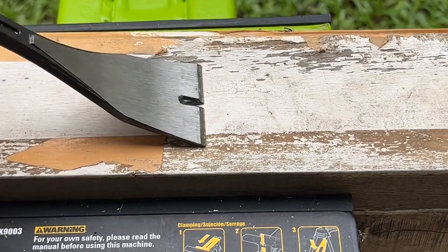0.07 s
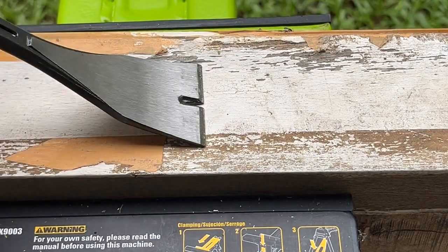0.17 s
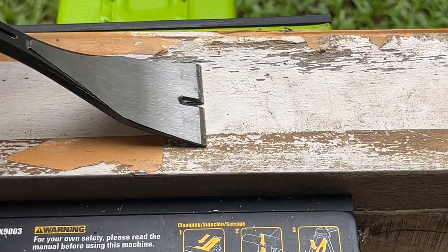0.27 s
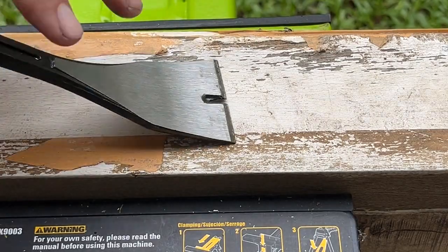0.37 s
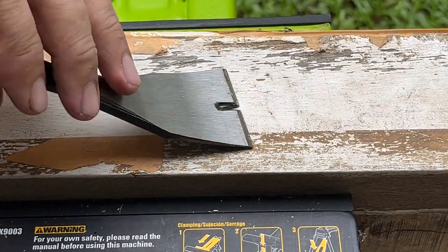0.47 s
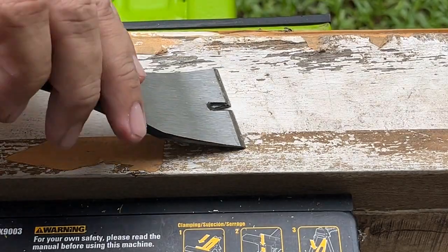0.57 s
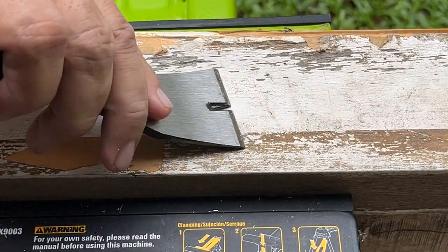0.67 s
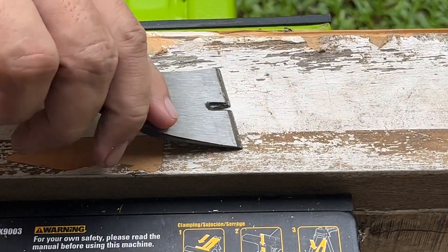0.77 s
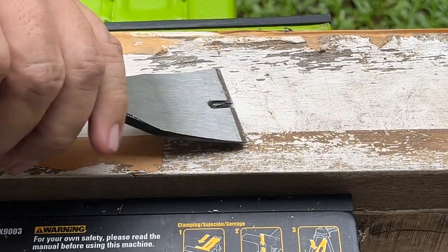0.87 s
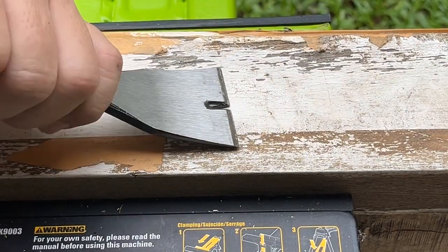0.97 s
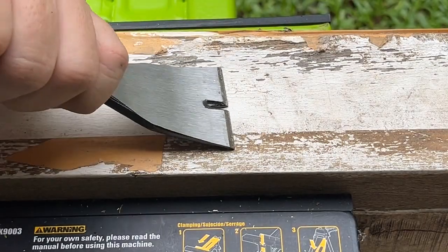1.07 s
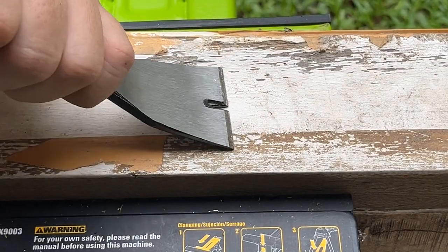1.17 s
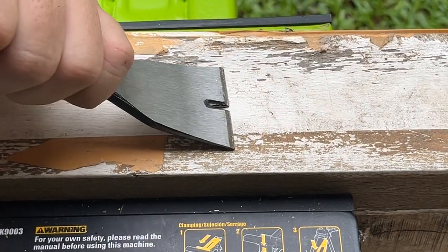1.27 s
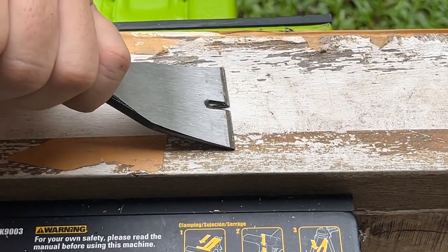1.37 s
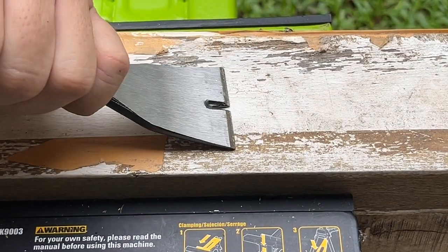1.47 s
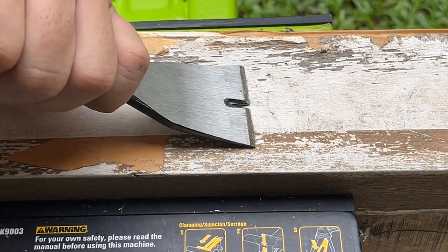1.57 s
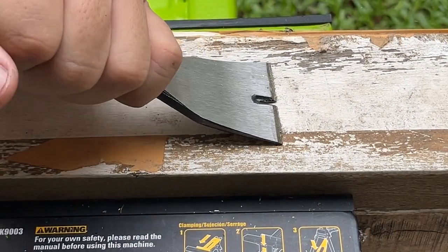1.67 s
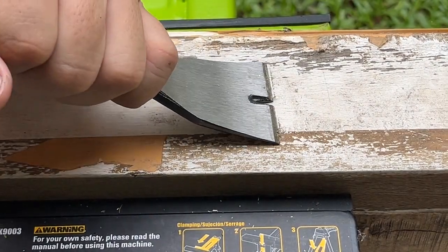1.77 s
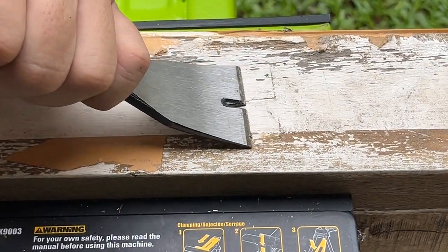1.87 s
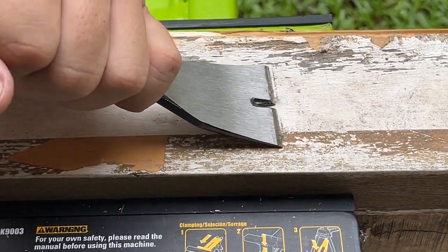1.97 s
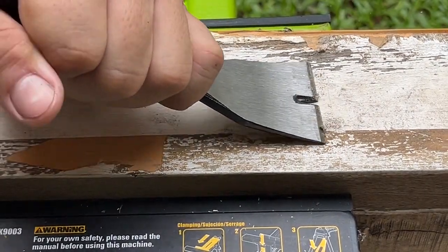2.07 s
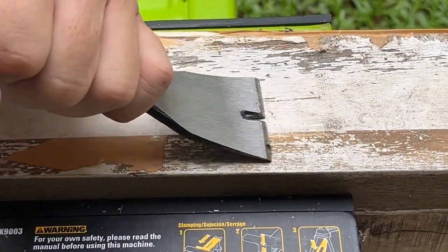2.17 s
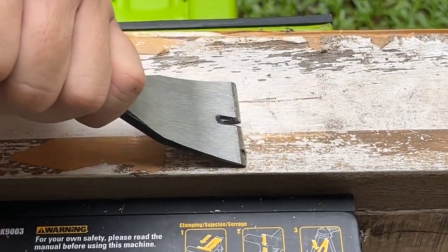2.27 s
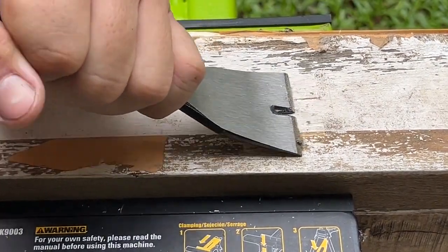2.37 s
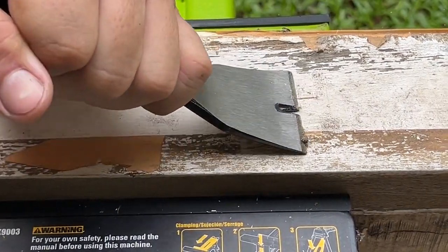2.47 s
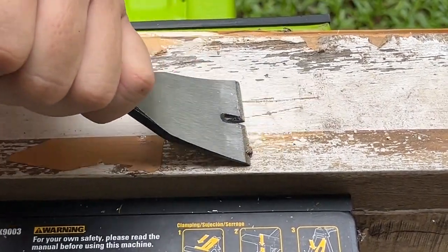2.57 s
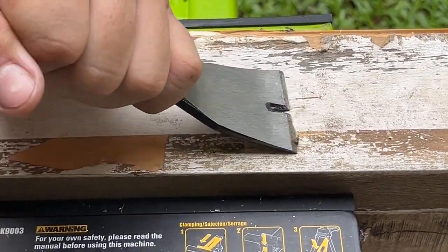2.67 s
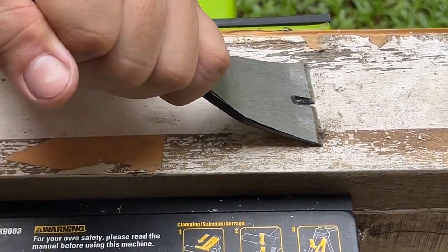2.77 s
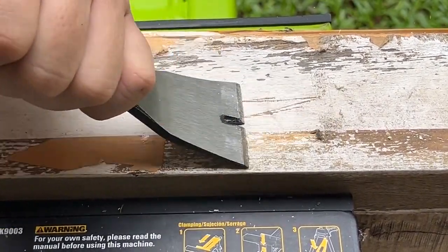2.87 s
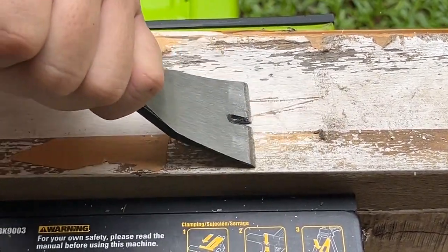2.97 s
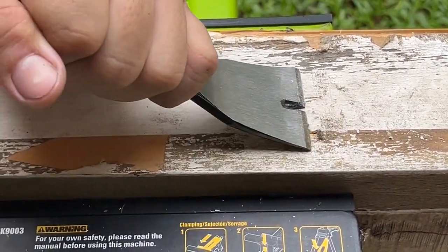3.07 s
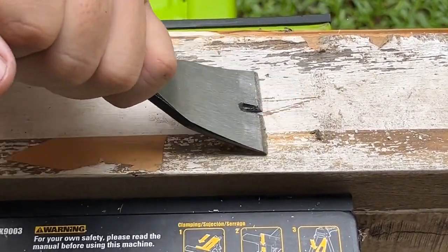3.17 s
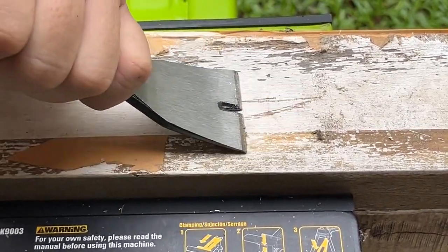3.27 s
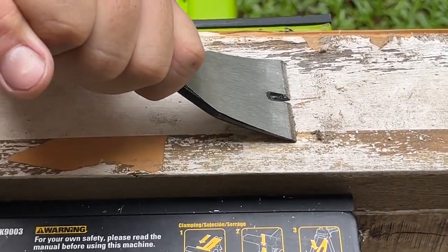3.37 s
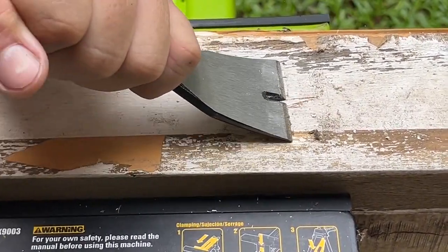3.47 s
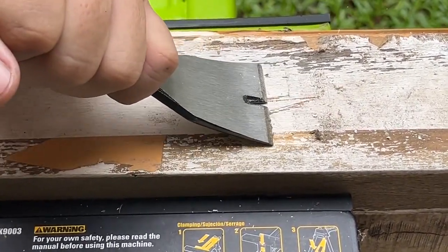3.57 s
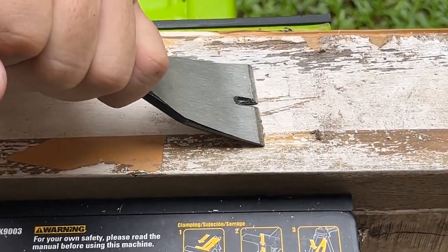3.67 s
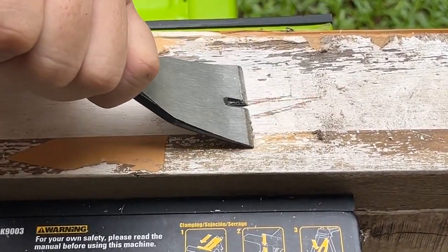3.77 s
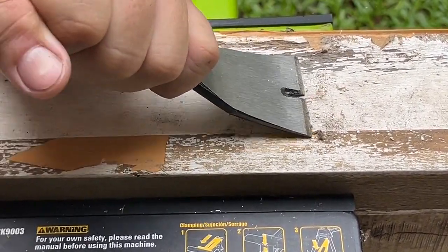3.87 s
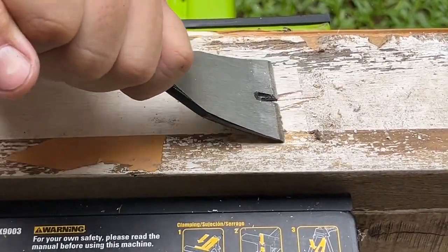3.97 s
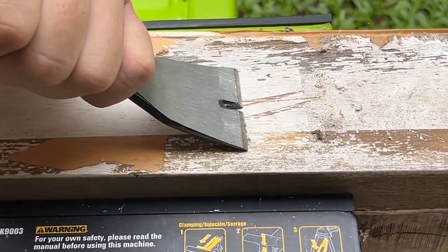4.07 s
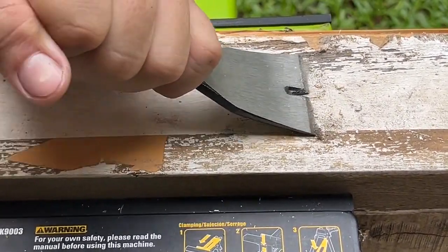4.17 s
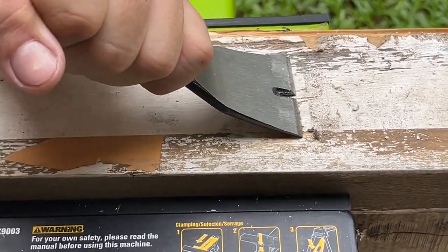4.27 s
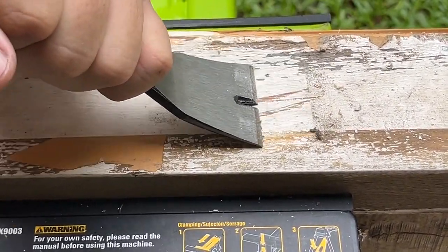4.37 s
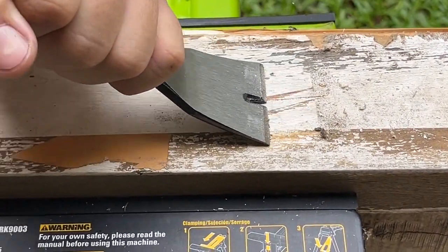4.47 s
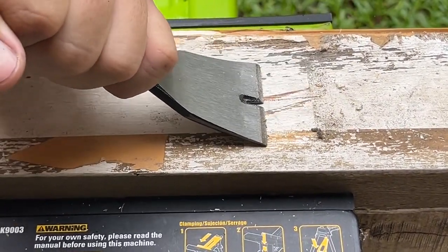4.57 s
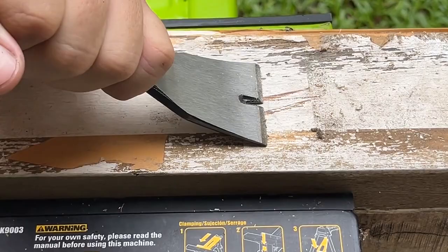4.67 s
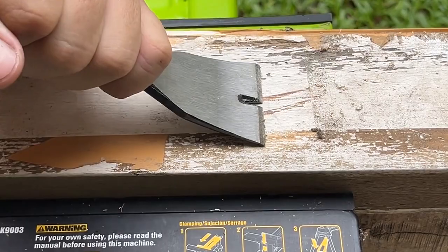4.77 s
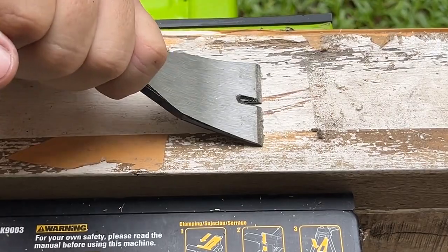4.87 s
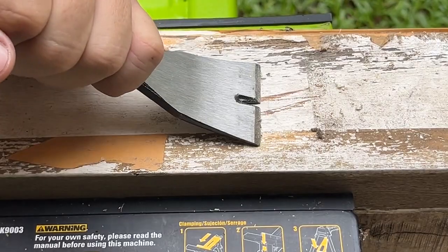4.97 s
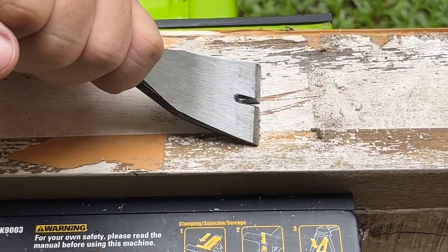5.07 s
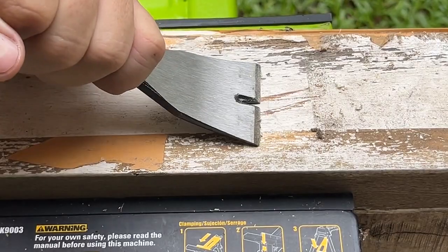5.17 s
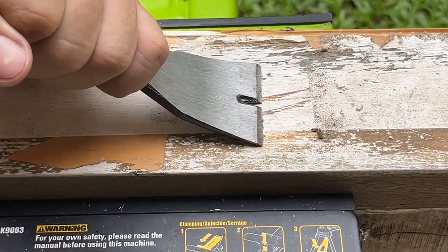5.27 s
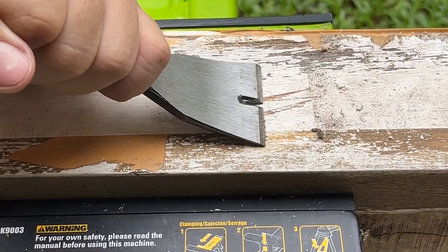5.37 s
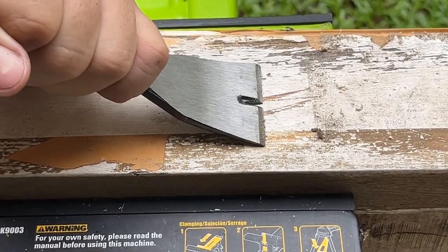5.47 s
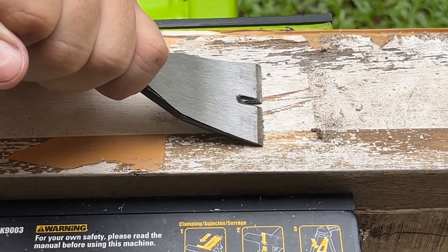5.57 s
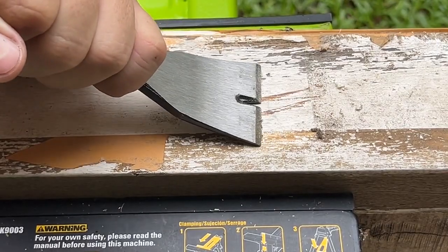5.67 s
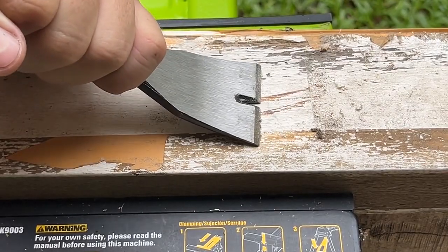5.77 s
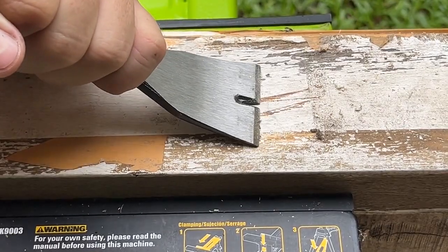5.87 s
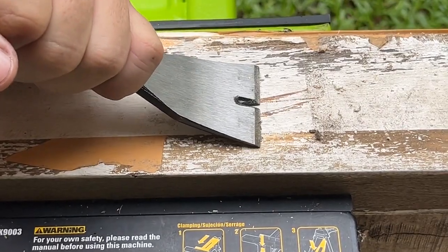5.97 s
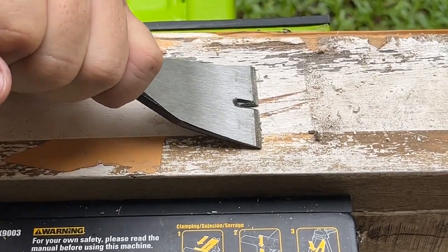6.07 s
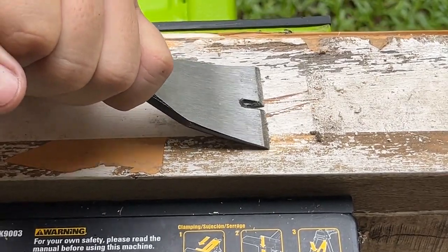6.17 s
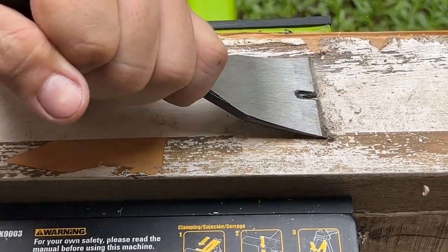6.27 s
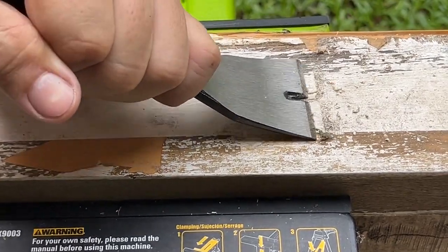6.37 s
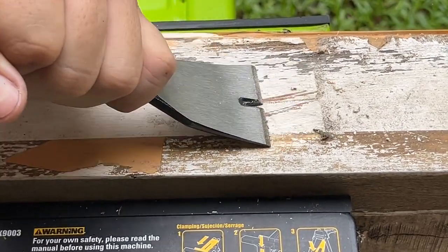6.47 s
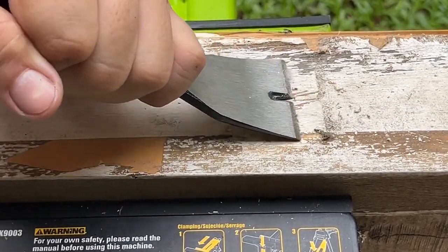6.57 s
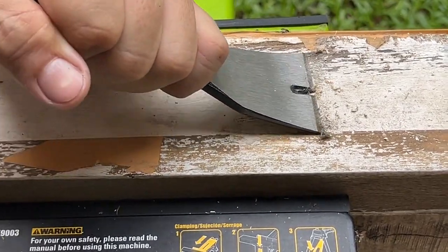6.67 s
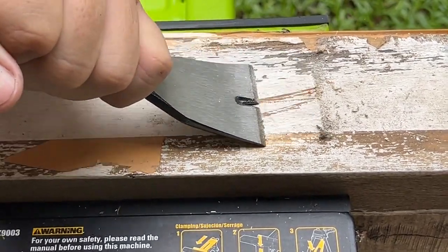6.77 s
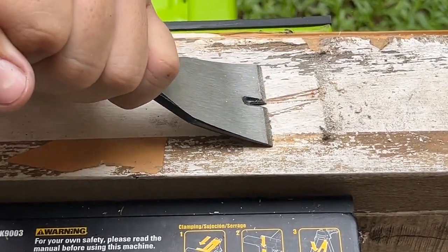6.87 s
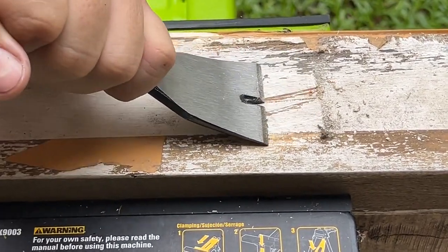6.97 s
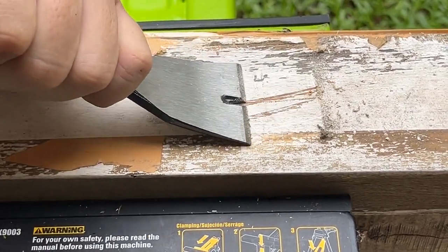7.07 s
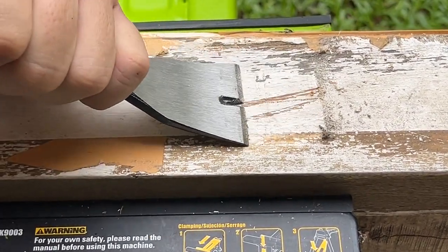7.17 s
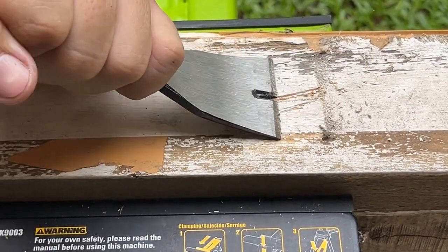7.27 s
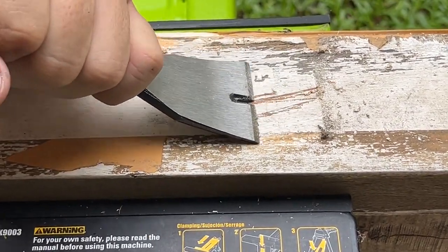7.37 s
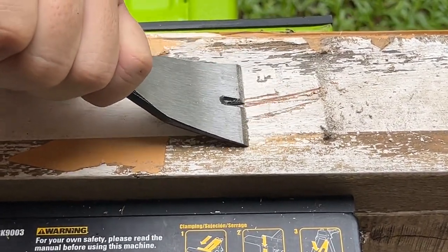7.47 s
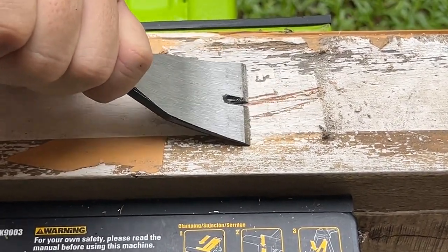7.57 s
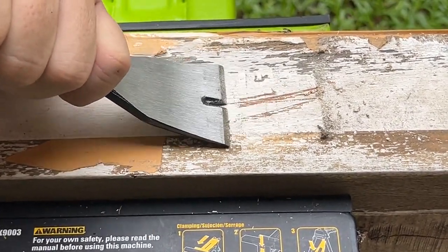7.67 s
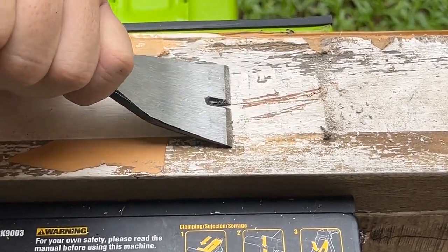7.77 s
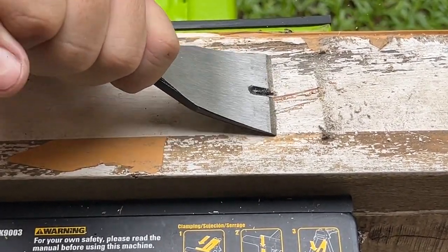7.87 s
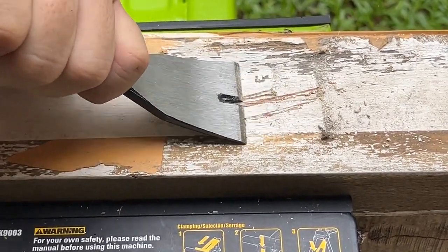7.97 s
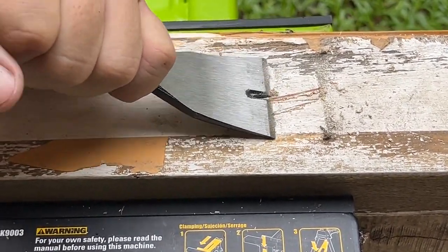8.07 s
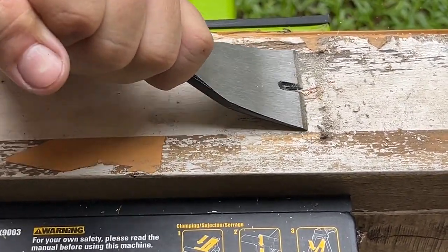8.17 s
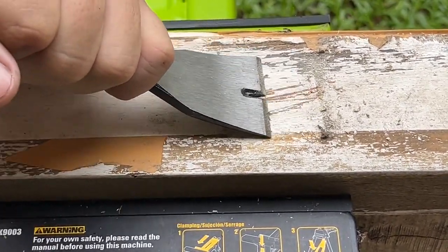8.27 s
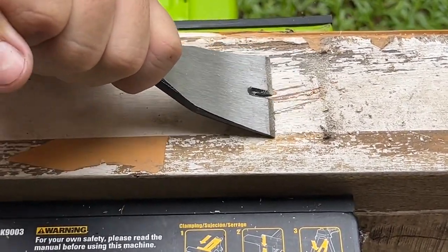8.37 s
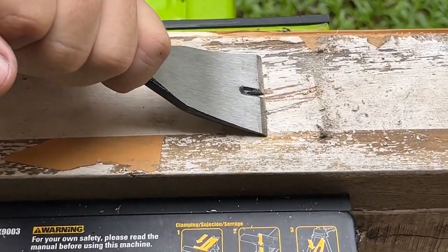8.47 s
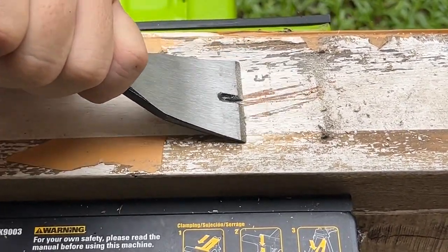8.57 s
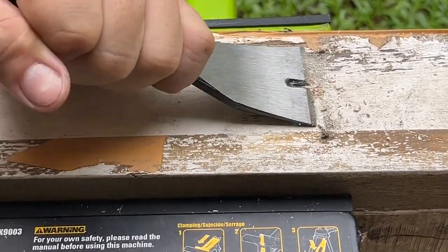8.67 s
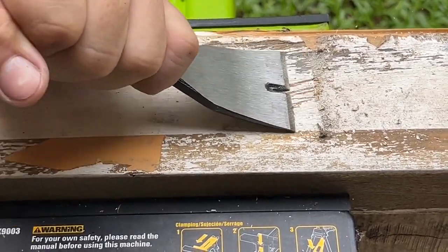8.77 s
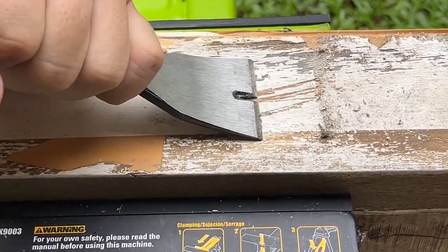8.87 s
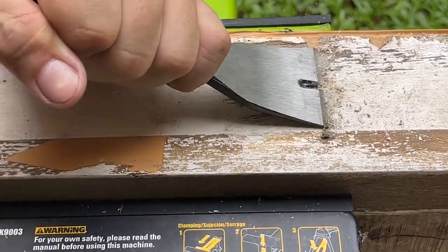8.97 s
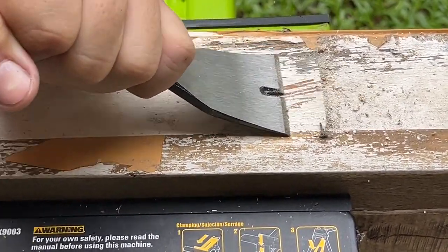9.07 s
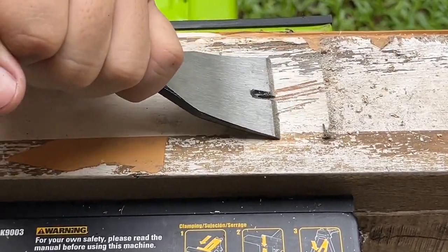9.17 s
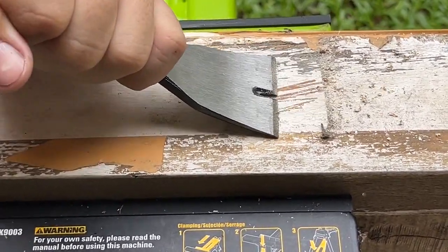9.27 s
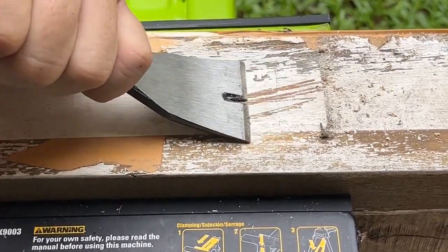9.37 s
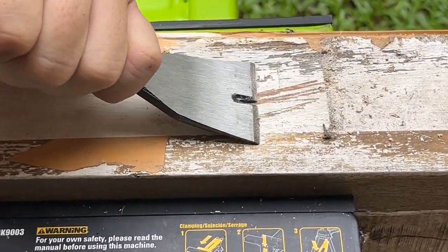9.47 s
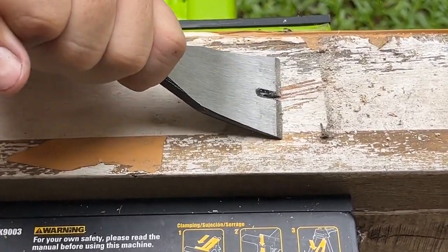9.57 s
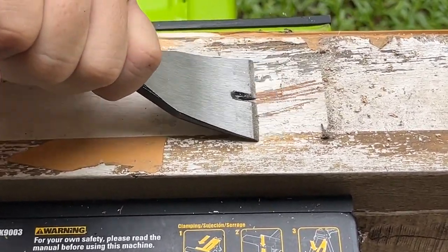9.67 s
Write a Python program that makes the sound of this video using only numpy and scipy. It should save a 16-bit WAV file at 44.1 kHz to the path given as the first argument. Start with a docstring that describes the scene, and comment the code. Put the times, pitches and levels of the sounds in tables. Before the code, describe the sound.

A quiet yard, close microphone. Soft gritty shuffling, wind buffets and a few small knocks as a hand takes a flat steel bar. Then short, harsh scrapes over flaking painted wood, strong pushes alternating with weaker draws back. A pause of shuffles, knocks and wind thumps, with distant rising bird whistles, precedes a second, quicker series that runs to the end.

```python
"""A hushed yard with gritty shuffling, wind on the microphone and small knocks; then a flat steel bar scrapes close by.
It is pushed and drawn back in short strokes over flaking paint on a board. Random snaps of paint and fine grinding
noise ring resonances of board and bar. Birds are wavering whistles with an echo, wind is low noise in short
bursts, knocks and the singing steel are decaying or wavering tones. Hush, rumble and a faint whine lie beneath."""
import sys
import numpy as np
from scipy import signal
from scipy.fft import rfft, irfft, next_fast_len
from scipy.io import wavfile
from scipy.ndimage import uniform_filter1d

SR = 44100
rng = np.random.default_rng(int(sys.argv[2]) if len(sys.argv) > 2 else 0)


def int16_out(signal):
    """Quantize to a 16-bit WAV file."""
    q = np.round(np.clip(np.atleast_2d(signal).T, -1, 1) * 32767)
    wavfile.write(sys.argv[1], SR, q.astype(np.int16))


N = 429093  # length of the scene in samples

# Hard pushes and lighter draws back: start_s, length_s, rasp_db, peak_share (part of the stroke gone by when
# it is strongest), pressure (0 to 1), hum_drive_db (over the rasp), brightness_db
STROKES = [(1.535, 0.14, -22.5, 0.31, 0.7, -13, -6), (1.749, .13, -41, 0.48, 0, -30, -4),
           (1.946, 0.11, -21, 0.31, 0.9, -11.5, 2), (2.099, 0.14, -35, 0.4, 0.24, -38, 1),
           (2.308, 0.12, -21.5, 0.32, 1, -23, 2), (2.461, .12, -30.5, 0.47, 0.2, -20, -1.5),
           (2.629, 0.11, -21.5, 0.36, .75, -29, 1.5), (2.777, 0.12, -33.5, 0.37, .05, -18.5, -0.5),
           (2.967, 0.12, -25, 0.3, 0.98, -23.5, 2.5), (3.119, .14, -33, .3, 0, -23, -8),
           (3.294, 0.096, -24, 0.39, 1, -16, 0), (3.453, 0.093, -39, 0.53, 0.4, -24, -2.5),
           (3.642, 0.086, -43.5, 0.57, 0.2, -21, -1), (3.786, 0.089, -22.5, 0.68, 1, -8.5, -1),
           (3.94, 0.11, -31, .38, 0.1, -27, -1.5), (4.106, 0.099, -26.5, 0.31, 0.97, -12.5, 2),
           (4.251, .1, -33, 0.4, 0.36, -19, 1), (4.434, .034, -34, 0.39, 1, -13, -3.5),
           (6.172, 0.099, -23.5, 0.6, 0.85, -16.5, 2.5), (6.351, 0.13, -35, 0.33, 0.25, -19, 4.5),
           (6.536, 0.064, -31.5, 0.34, 0.6, -20, 2.5), (6.585, 0.042, -23, 0.35, 0.73, -15.5, 1),
           (6.68, 0.13, -34, 0.41, 0.23, -22, 4), (6.843, 0.031, -35, 0.53, 0.8, -25, -12),
           (7.026, 0.099, -40.5, 0.32, 0, -24, 0), (7.188, 0.083, -25, 0.39, 1, -10, 0.5),
           (7.331, 0.094, -35, 0.43, .25, -22, 0), (7.455, 0.07, -38.5, 0.79, 0.84, -18, -4),
           (7.626, 0.083, -39.5, 0.32, 0.1, -24, 0), (7.77, 0.088, -19, 0.45, 0.79, -21, -7),
           (7.903, 0.092, -35.5, .58, .4, -33, -0.5), (8.044, 0.093, -19, 0.5, 0.66, -20, -3),
           (8.19, 0.089, -35, 0.52, 0.5, -23, 3.5), (8.305, 0.057, -43.5, 0.55, 0.96, -16, -3),
           (8.463, 0.075, -37.5, 0.63, 0.06, -17, -0.5), (8.608, 0.097, -23, 0.73, 0.91, -22, 0.5),
           (8.728, .12, -30, 0.55, 0.3, -32, -5), (8.899, 0.08, -19.5, .62, 0.78, -25, 0.5),
           (9.014, 0.11, -31, 0.47, .25, -21, -5), (9.167, 0.044, -33.5, .4, 1, -13, -1),
           (9.313, 0.1, -34.5, 0.44, 0.05, -25, 0), (9.457, 0.084, -23.5, 0.61, 1, -13, 0),
           (9.591, 0.073, -32.5, 0.47, 0.07, -24, -6.5), (9.685, 0.056, -28, 0.42, .7, -14, -3)]
# Share-out of each stroke, rows board, blade, face, edge: lightest_touch_db and full_pressure_db (both over
# the rasp), brightness_share (0 to 1)
PART_LEVELS = [(-13, 0.5, 0), (-9.5, -9, 0.73), (-13, -18.5, 0.98), (-4.5, -10.5, 0.86)]
# Resonances of the board and of four parts of the bar: pitch_hz, width_hz, level_db
BOARD = [(344, 59, -17.5), (491, 68, -7.5), (536, 64.3, -2), (609.4, 32, 0), (713, 26.5, -9.5)]
SHANK = [(829, 70, -10), (901.4, 55, 0.5), (975, 54.6, -0.5), (1067, 53, -9), (1154, 120, -15),
         (1348, 100, -12), (1436, 115, -11.5), (1633, 660, -18.5), (1740, 164, -12.5), (1962, 78, -10.5),
         (2051, 120, -13.5), (2160, 51, -18)]
BLADE = [(2510, 77, -19.5), (2950, 260, -17.5), (3286, 200, -1), (3520, 167, 5), (3780, 118, 1.5),
         (3930, 320, -16.5)]
FACE = [(5470, 210, -1.5), (6500, 550, 0), (6906, 450, 0.5), (7460, 420, -5)]
EDGE = [(8770, 530, -4.5), (9660, 590, -5.5), (10070, 270, 0.5), (11160, 520, 4), (11580, 620, 0.5),
        (12500, 300, -4.5), (13700, 540, -8), (14600, 700, -13.5)]
BITE_DB, LET_GO_DB = 16, 29.5  # how far under its strongest a stroke starts and ends
BITE_BEND, LET_GO_BEND = 1.59, 2.39  # higher powers keep the stroke strong for longer
SLOW_STEEL_DB = 4.5  # face and edge start this much weaker still, until the bar is up to speed


def scraping():
    """Friction drives board and bar together; pressing harder wakes the board and dulls the steel."""
    gains = np.zeros((6, N))  # rows: shank, board, blade, face, edge, hum
    for start, length, db, peak, pressure, hum_db, bright_db in STROKES:
        i = np.arange(int(start * SR), min(int((start + length) * SR), N))
        progress = (i / SR - start) / length
        before_peak = np.clip(1 - progress / peak, 0, 1)
        after_peak = np.clip((progress - peak) / (1 - peak), 0, 1)
        rasp_db = db - BITE_DB * before_peak ** BITE_BEND - LET_GO_DB * after_peak ** LET_GO_BEND
        parts_db = [light + (hard - light) * pressure + share * bright_db
                    for light, hard, share in PART_LEVELS]
        levels_db = rasp_db + np.array([0, *parts_db, hum_db])[:, None]
        levels_db[3:5] -= SLOW_STEEL_DB * before_peak
        gains[:, i] += undb(levels_db)
    gains = uniform_filter1d(gains, size=260)  # the edge bites and lets go within a few ms

    coarse = friction(rate=1800, scatter_db=2.5, grit=0.93, patchy_db=2.0)
    fine = friction(rate=5500, scatter_db=3.0, grit=1.7, patchy_db=2.5)
    mixed = 0.47 * coarse + 0.72 * fine
    forces = coarse, coarse, mixed, fine, fine
    parts = SHANK, BOARD, BLADE, FACE, EDGE
    rasping = sum(ring(gain * force, modes, shift_db=3.5)
                  for gain, force, modes in zip(gains[:5], forces, parts))
    return rasping + board_hum(gains[5]) + bench_shake(gains[0])


HUM_HZ, HUM_T60_S = 509, 0.26  # pitch, and time to die away by 60 dB


def board_hum(push):
    """Slips lock to one board resonance, which builds while pushed and fades as a slightly wavering tone."""
    keep = np.exp(-np.log(1000) / (HUM_T60_S * SR))
    swing = signal.lfilter([1 - keep], [1, -keep], push * undb(1.4 * walk(60)))
    pitch = HUM_HZ * (1 + 0.00596 * walk(30))
    return 3 * swing * np.sin(2 * np.pi * np.cumsum(pitch) / SR)


# Colour of the low rumble, used for the bench here and for far traffic and light air in yard():
# pitch_hz, level_db (per Hz)
RUMBLE_COLOUR = [(15, -5), (30, -3), (90, -4.5), (200, -7.5), (400, -34)]
SHAKE_DB, SHAKE_S = -26, 0.069  # level over the rasp, and the span over which the shake is smoothed


def bench_shake(rasp_gain):
    """The bench shakes under each stroke as low noise that follows a smoothed copy of the rasp."""
    smooth = uniform_filter1d(rasp_gain, int(SHAKE_S * SR))
    return undb(SHAKE_DB) * smooth * coloured(RUMBLE_COLOUR, size=N)


# Small hard ticks and knocks: start_s, level_db, pitch_hz, treble_crack_db (over the level)
KNOCKS = [(0.396, -28.5, 1360, -9), (0.455, -33, 931, -11), (0.493, -20, 1290, -18.5),
          (0.864, -55, 1070, 12), (0.952, -40.5, 1580, 0), (1.049, -33, 1750, -24), (1.298, -54, 985, 11),
          (4.85, -41.5, 1250, 1.5), (4.931, -38, 1890, 0.5), (5.149, -29, 1970, -29),
          (5.406, -22, 1740, -18), (5.814, -13.5, 1550, -19), (5.819, -27, 1610, -5),
          (6.862, -36, 920, -22), (9.238, -30, 420, -20), (9.461, -29, 900, -20)]
# Colour of the duller part of each crack: pitch_hz, level_db (per Hz)
KNOCK_COLOUR = [(180, -27), (300, 4), (1630, -6), (3280, -12), (4750, -26), (5520, -15), (8000, -26),
                (10400, -59), (17600, -120)]
# Colour of the crack's treble, shared with rustling(): pitch_hz, level_db (per Hz)
RUSTLE_COLOUR = [(2940, -50), (5000, -7), (5910, -7), (7010, -5), (7460, -10), (8560, -10), (10100, 2.5),
                 (12300, -3), (13600, -8.5), (15600, -12)]


def knocks():
    """Each knock is a few cycles of a dull ring with a short crack of noise."""
    out, size = np.zeros(N), 1024
    t = np.arange(size) / SR
    shape = (1 - np.exp(-t / 0.00033)) * np.exp(-t / 0.0031)  # quick rise, then a decay of a few ms
    for start, db, hz, crack_db in KNOCKS:
        treble = undb(crack_db) * coloured(RUSTLE_COLOUR, size=size)
        crack = treble + 0.4 * coloured(KNOCK_COLOUR, size=size)
        i = int(start * SR)
        out[i:i + size] += undb(db) * 0.87 * shape * (np.sin(2 * np.pi * hz * t) + crack)
    return out


# Moments when the steel sings: start_s, attack_s, hold_s, release_s, level_db
SINGS = [(.335, 0.043, 0.03, .07, -46), (.53, 0.011, .04, .05, -63)]
# Tones of the singing steel: pitch_hz, level_db
SING_TONES = [(7190, -21), (9810, -11), (10510, 2.5), (12700, -7)]


def singing_steel():
    """The steel sings as fingers slide onto it: a few high tones that waver separately."""
    return swell(SINGS) * tones(SING_TONES, waver_db=3.5)


# Shuffling nearby: start_s, attack_s, hold_s, release_s, level_db, grit_db (upper resonances, over that level)
SHUFFLES = [(0., .002, .01, 0.37, -48, -13), (.2, .15, 0.14, .03, -50, -11),
            (0.488, 0.018, 0.061, 0.19, -40.5, -12), (4.996, 0.016, 0.039, .08, -37, -5.5),
            (5.064, 0.0069, .015, 0.11, -41.5, -3.5), (5.129, 0.021, .005, 0.021, -36.5, -6.5),
            (5.16, .01, 0.16, .05, -50.5, -5.5), (5.35, .01, 0.019, 0.045, -43, -8),
            (5.391, 0.016, .01, 0.088, -36, -8), (5.428, .02, 0.14, .1, -48.5, -6.5),
            (5.805, 0.012, 0.0034, .014, -18.5, -7.5), (5.823, .008, 0.032, 0.25, -32, -6),
            (6.456, 0.033, 0.043, 0.034, -45, -13), (6.8, 0.049, .01, 0.093, -48, -12)]
# Resonances rung by the shuffling, four dull ones and then the gritty ones: pitch_hz, width_hz, level_db
SHUFFLE_MODES = [(465, 184, 1), (860, 500, -2.5), (1495, 270, 1.5), (1810, 266, -1.5), (2450, 650, -9.5),
                 (3540, 570, -8), (6520, 450, -20)]


def shuffling():
    """One rubbing force rings dull low resonances and, more or less strongly, gritty upper ones."""
    force = friction(rate=900, scatter_db=2.5, grit=1.16, patchy_db=0.5)
    dull = swell([row[:5] for row in SHUFFLES])
    gritty = swell([(*row[:4], row[4] + row[5]) for row in SHUFFLES])
    low = ring(dull * force, SHUFFLE_MODES[:4], shift_db=3.0)
    high = ring(gritty * force, SHUFFLE_MODES[4:], shift_db=2.5)
    return low + high


# Soft treble rustles: start_s, attack_s, hold_s, release_s, level_db
RUSTLES = [(.31, .03, .06, .15, -53), (.53, 0.036, .02, 0.29, -54.5), (4.96, .03, .005, .02, -47),
           (5., .03, .08, 0.19, -54.5), (5.23, 0.066, .02, .05, -46), (5.37, 0.038, .01, .1, -48.5),
           (5.49, 0.032, .055, .1, -49), (5.803, .011, .008, .012, -39), (5.82, .008, .01, .18, -49)]


def rustling():
    """Soft bursts of treble noise with an unsteady level."""
    return swell(RUSTLES) * undb(1.6 * walk(160)) * coloured(RUSTLE_COLOUR, size=N)


# Gusts on the microphone: start_s, attack_s, hold_s, release_s, level_db
GUSTS = [(.1, .025, .02, .04, -49), (.16, 0.017, 0.037, .035, -31.5), (.26, 0.026, .025, 0.032, -40),
         (5.125, 0.048, 0.037, 0.019, -21), (5.25, .02, .08, .05, -53), (5.43, 0.028, 0.037, 0.03, -26.5),
         (5.51, 0.013, 0.018, .025, -34), (9.49, .01, 0.027, 0.06, -44), (9.63, .1, .01, .01, -39)]
# Colour of the gusts: pitch_hz, level_db (per Hz)
GUST_COLOUR = [(15, -30), (30, -7), (55, 3.5), (100, -1), (140, -5), (220, -14), (330, -18), (500, -31),
               (1000, -80)]
PUFF_S, PUFF_DB, PUFF_WIDTH_S = 5.533, -11.5, 0.0016  # one sharp pressure pulse


def wind():
    """Eddies push the microphone's membrane to and fro with a nearly even swing."""
    eddies = np.tanh(1.1 * coloured(GUST_COLOUR, size=N))  # rounding evens out the swing
    soften = signal.butter(2, 300, fs=SR, output="sos")
    gusts = swell(GUSTS) * signal.sosfilt(soften, eddies / eddies.std())
    u = (clock() - PUFF_S) / PUFF_WIDTH_S
    puff = np.exp(-u ** 2) - 0.16 * np.exp(-((u - 3) / 3) ** 2)  # a pulse, then a shallow dip
    return gusts + undb(PUFF_DB) * puff


# A bird's rising whistles: start_s, length_s, pitch_hz (before the climb), climb_hz_per_s, level_db
WHISTLES = [(4.3, .075, 4230, 1000, -53), (5.132, 0.156, 3960, 3930, -50), (5.652, 0.13, 3970, 3700, -49),
            (6.255, .125, 3930, 4370, -48.5), (6.965, .18, 3830, 2700, -55.5)]
# A lower cooing bird: start_s, length_s, pitch_hz (before the climb), climb_hz_per_s, level_db
COOS = [(4.67, 0.035, 1303, 400, -50), (4.855, 0.064, 1280, 900, -49.5)]
SCOOP_HZ, SCOOP_S = 652, .016  # a whistle starts this far below its pitch and closes in this quickly
CALL_ATTACK_S, CALL_RELEASE_S = .012, .025
BIRD_T60_S, BIRD_ECHO_DB = 0.72, -3  # echo's time to die away by 60 dB, and its level


def birds():
    """Hoarse, nearly pure tones with many far reflections; whistles scoop up, and all calls climb steadily."""
    out = 0
    flutter = 1 + .02 * walk(450)
    hoarse = undb(5.1 * walk(250))
    for calls, scoop_hz in (WHISTLES, SCOOP_HZ), (COOS, 0):
        for start, length, hz, climb, db in calls:
            age = np.clip(clock() - start, 0, length + CALL_RELEASE_S)
            pitch = (hz + climb * age - scoop_hz * np.exp(-age / SCOOP_S)) * flutter
            shape = swell([(start, CALL_ATTACK_S, length - CALL_ATTACK_S, CALL_RELEASE_S, db)])
            out = out + shape * hoarse * np.sin(2 * np.pi * np.cumsum(pitch) / SR)
    reflections = rng.standard_normal(SR // 2) * echo(BIRD_T60_S, size=SR // 2)
    far = signal.fftconvolve(out, reflections)[:N]
    return out + undb(BIRD_ECHO_DB) * far


# Colour of the hush: pitch_hz, level_db (per Hz)
HUSH_COLOUR = [(12, -28), (20, 2.5), (232, -0.5), (307, 1), (362, -1.5), (582, -4), (748, -9), (1770, -12),
               (2620, -19), (3460, -17), (4450, -21), (7760, -23), (11500, -18.5), (14300, -24),
               (15600, -26)]
# Tones of the faint electric whine: pitch_hz, level_db
WHINE = [(2400, -76), (4000, -77), (4800, -81), (9600, -79), (10400, -78), (11200, -81)]
HUSH_DB, RUMBLE_DB = -48, -60


def yard():
    """A smooth hush, a rumble that comes and goes, and a faint electric whine."""
    hush = undb(HUSH_DB + .5 * walk(1.97)) * coloured(HUSH_COLOUR, size=N)
    rumble = undb(RUMBLE_DB + 4.5 * walk(4.4)) * coloured(RUMBLE_COLOUR, size=N)
    return hush + rumble + tones(WHINE, waver_db=3.5)


WALL_DB, WALL_T60_S, WALL_HZ = -14.5, 0.74, 2770  # level, time to die away by 60 dB, treble limit


def walls(near):
    """The walls around the yard return a dense, fading, duller copy of near sounds."""
    dull = signal.butter(1, WALL_HZ, fs=SR, output="sos")
    reflections = signal.sosfilt(dull, rng.standard_normal(SR // 2))
    returned = signal.fftconvolve(near, reflections * echo(WALL_T60_S, size=SR // 2))[:N]
    return undb(WALL_DB) * returned


def friction(rate, scatter_db, grit, patchy_db):
    """Flakes or grains snap at random, rate a second, over fine grinding; rough and smooth patches alternate."""
    happens = rng.random(N) < rate / SR
    sizes = undb(scatter_db * rng.exponential(size=N))
    snaps = happens * sizes * rng.choice([-1, 1], N)
    force = snaps / snaps.std() + grit * rng.standard_normal(N)
    force = force * undb(patchy_db * walk(180))
    return force / force.std()


def ring(x, modes, shift_db):
    """Resonances add up; the contact point wanders, so each is driven now harder, now softer."""
    out, power = 0, 0
    for k, (hz, width, db) in enumerate(modes):
        r = np.exp(-np.pi * width / SR)  # a wider resonance dies sooner
        gain = (-1) ** k * undb(db) * (1 - r * r) / 2  # neighbours have opposite signs
        feedback = [1, -2 * r * np.cos(2 * np.pi * hz / SR), r * r]
        drive = x * undb(shift_db * walk(22))
        out = out + signal.lfilter([gain, 0, -gain], feedback, drive)
        power += undb(db) ** 2 * np.pi * width / SR
    return out / np.sqrt(power)  # white noise of rms 1 leaves with rms near 1


def tones(lines, waver_db):
    """Fixed pitches, each wavering in level on its own."""
    out = 0
    for hz, db in lines:
        wave = np.sqrt(2) * np.sin(2 * np.pi * (hz * clock() + rng.random()))
        out = out + undb(db + waver_db * walk(40)) * wave
    return out


def coloured(colour, size):
    """Noise of rms 1 whose spectrum follows the given pitch_hz, level_db points."""
    hz, db = np.transpose(colour)
    fast = next_fast_len(size)
    bins = np.arange(fast // 2 + 1) * SR / fast + 1  # 1 Hz up, to avoid the log of zero
    shape = undb(np.interp(np.log(bins), np.log(hz), db))
    x = irfft(rfft(rng.standard_normal(fast)) * shape, fast)[:size]
    return x / x.std()


ONSET_DB, FADE_DB = 16, 25  # a burst starts and dies this far under its level


def swell(bursts):
    """Gain of bursts that rise, hold and die away; silent between them, corners rounded."""
    gain = np.zeros(N)
    for start, attack, hold, release, db in bursts:
        corners = start + np.cumsum([0, attack, hold, release])
        i = np.arange(int(corners[0] * SR), min(int(corners[-1] * SR), N))
        gain[i] += undb(np.interp(i / SR, corners, [db - ONSET_DB, db, db, db - FADE_DB]))
    return uniform_filter1d(gain, size=180)


def echo(t60, size):
    """Strength of dense fading reflections over time, total power 1."""
    h = np.exp(-np.log(1000) * np.arange(size) / SR / t60)
    return h / np.sqrt(np.sum(h ** 2))


def walk(rate):
    """Random values, rate a second, joined by straight lines."""
    knots = rng.standard_normal(int(N / SR * rate) + 2)
    return np.interp(clock() * rate, np.arange(len(knots)), knots)


def clock():
    """Time of each sample in seconds."""
    return np.arange(N) / SR


def undb(db):
    """Decibels to gain."""
    return 10 ** (np.asarray(db) / 20)


def scene():
    """Scraping and knocks come back softly from the walls; the other sounds are added to them."""
    near = scraping() + knocks()
    nearby = singing_steel() + shuffling() + rustling() + wind()
    mix = near + walls(near) + nearby + birds() + yard()
    return mix[None]


TOP_HZ = 15730


def record(dry):
    """The phone rounds the loudest peaks and cuts the treble above TOP_HZ steeply."""
    steep = signal.ellip(12, .3, 70, TOP_HZ, fs=SR, output="sos")
    rounded = 0.44 * np.tanh(dry / 0.46)
    return signal.sosfilt(steep, rounded)


dry = scene()
out = record(dry)
int16_out(out)
```